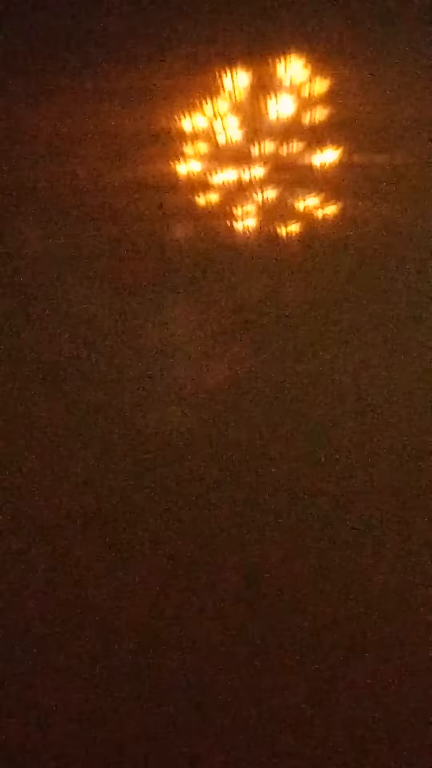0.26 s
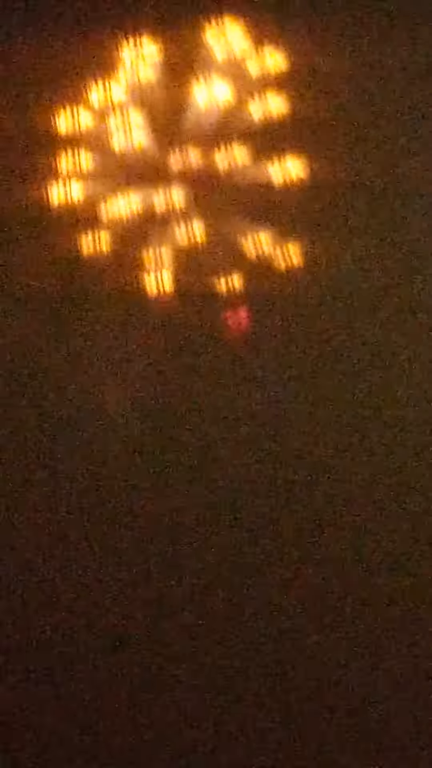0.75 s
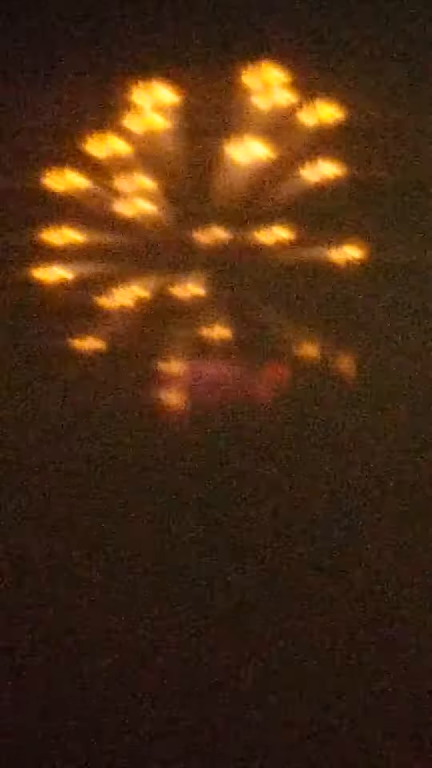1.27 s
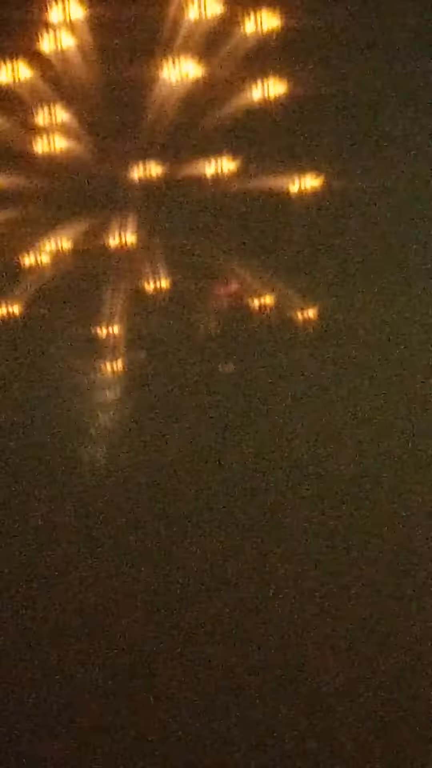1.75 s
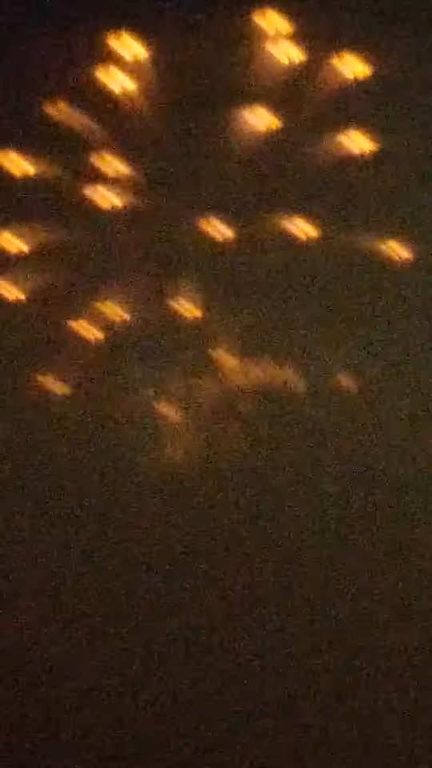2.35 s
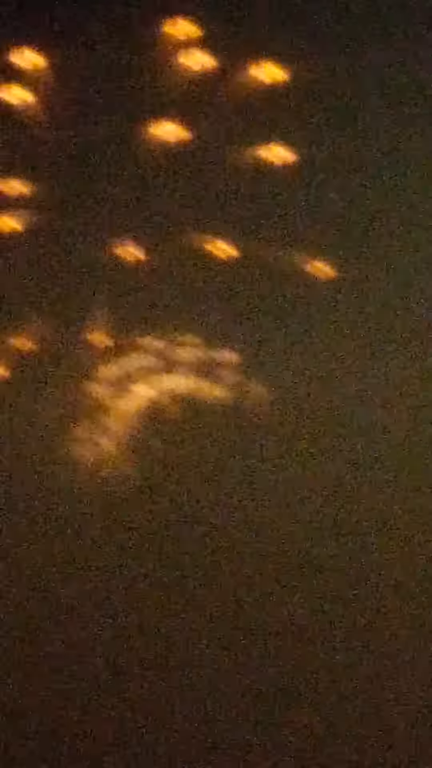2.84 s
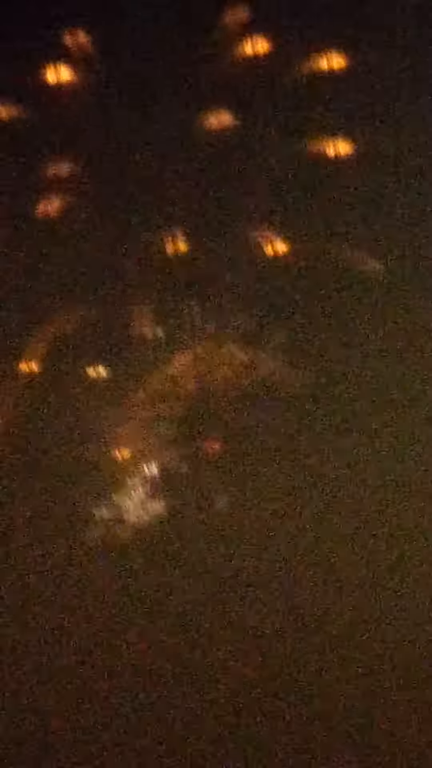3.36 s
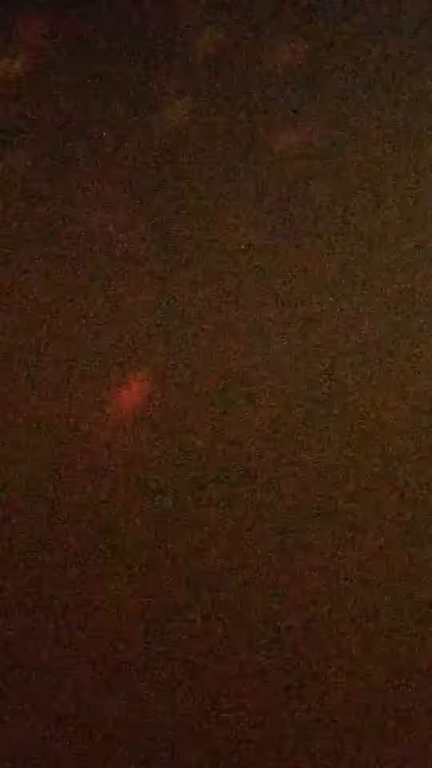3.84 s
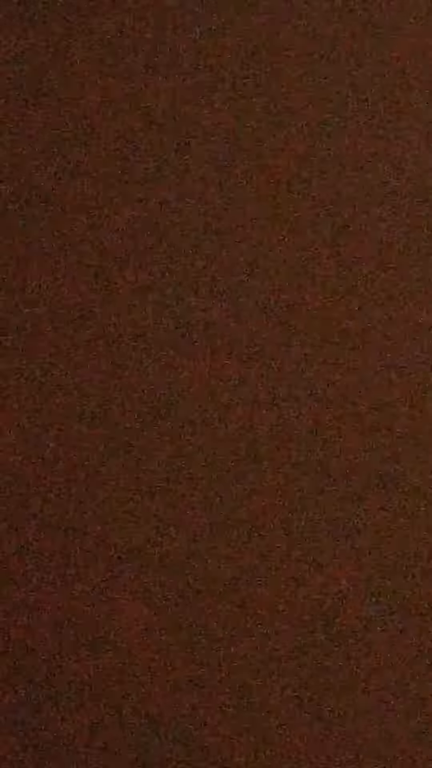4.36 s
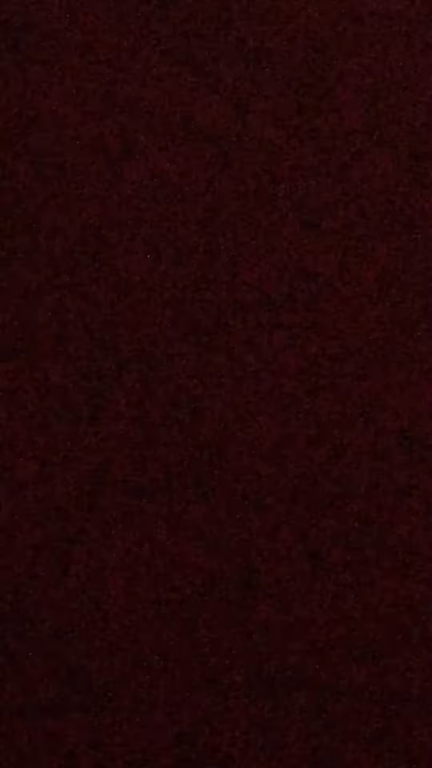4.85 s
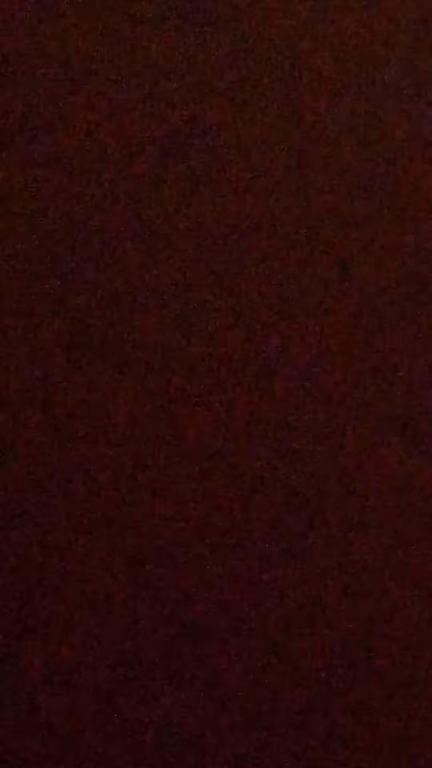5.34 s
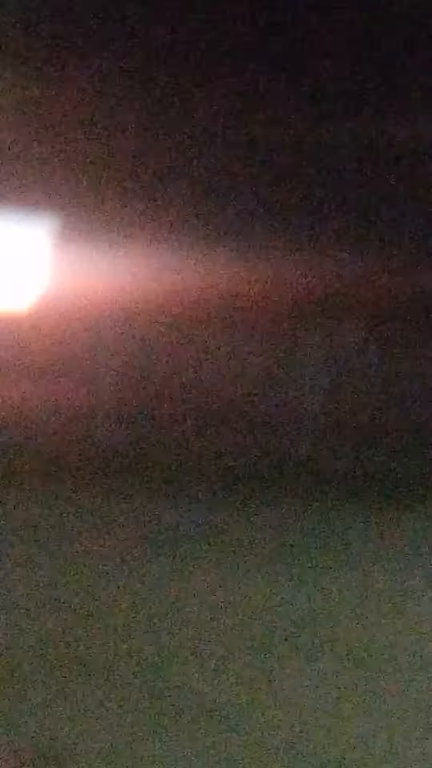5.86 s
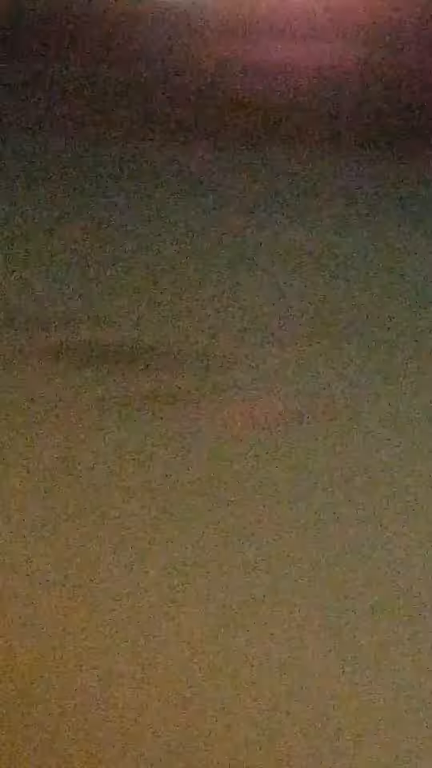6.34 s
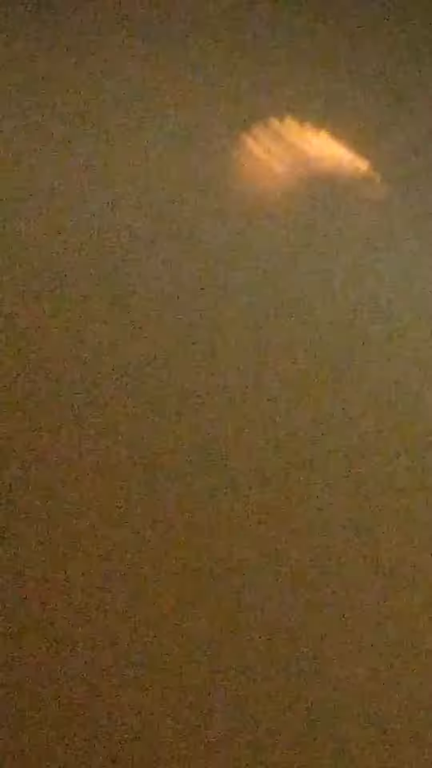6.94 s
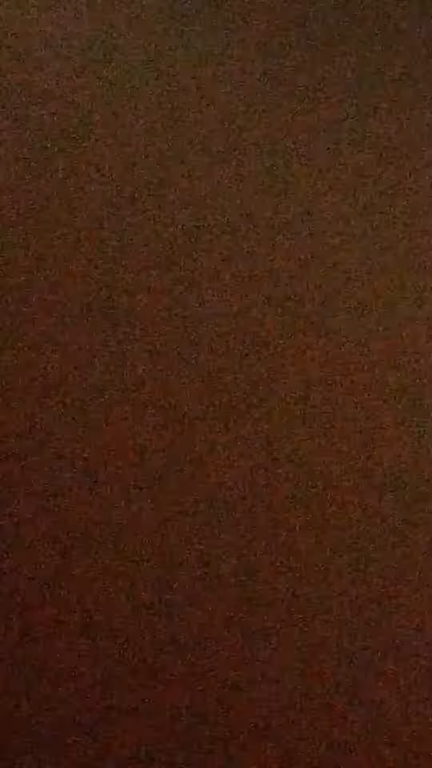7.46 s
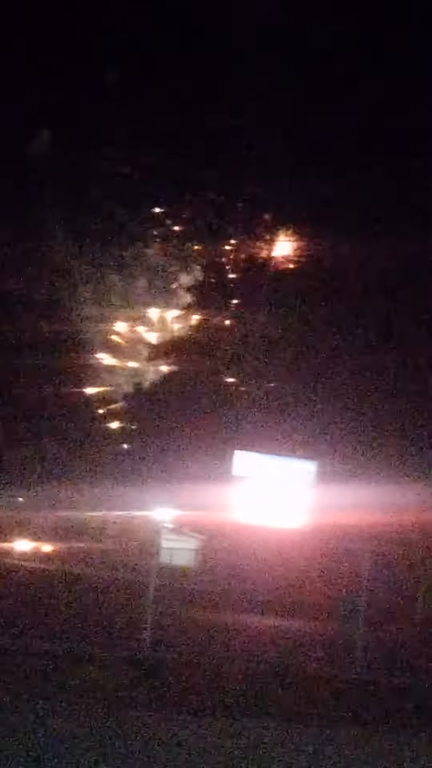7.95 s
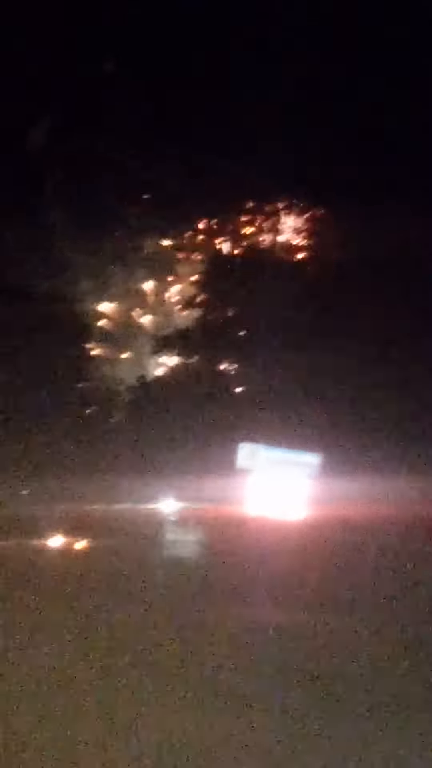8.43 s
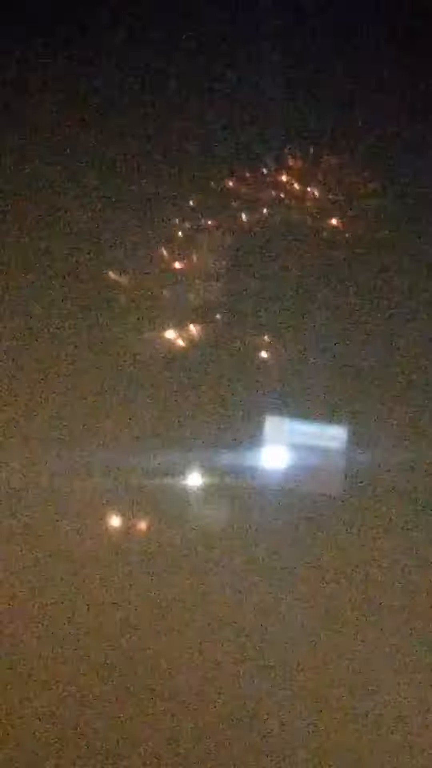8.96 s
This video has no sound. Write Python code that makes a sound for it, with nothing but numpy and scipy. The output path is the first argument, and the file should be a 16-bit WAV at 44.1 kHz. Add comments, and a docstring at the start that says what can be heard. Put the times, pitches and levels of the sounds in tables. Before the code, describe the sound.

Outdoors at night, a phone picks up fireworks bursting several times a second. Each is a dry crack with a low boom, quickly repeated by ground and walls, then a short rumble and faint wash from farther off. Sizes vary; the heaviest bangs come near eight seconds. Very faint crickets and a distant traffic hum lie beneath.

```python
"""Firework shells burst in quick succession over open ground at night, heard through a phone.
Each bang is a noise crack and a low pressure swing (boom), repeated by ground and walls; decaying noise
then rolls in from farther off. Rolls and one hollow slap without a sharp crack are noise near a pitch.
Two crickets trill in sagging tones over distant traffic, a filtered noise hum. Faint narrow hiss and
treble ticks are shaped noise."""
import sys
import numpy as np
from scipy import signal
from scipy.fft import rfft, irfft, next_fast_len
from scipy.io import wavfile
from scipy.ndimage import uniform_filter1d, map_coordinates

SR = 44100
rng = np.random.default_rng(int(sys.argv[2]) if len(sys.argv) > 2 else 0)


def persist_wave(psi):
    """Save psi, clipped to +-1, as 16-bit WAV."""
    counts = np.round(np.clip(psi, -1, 1) * 32767).astype(np.int16)
    wavfile.write(sys.argv[1], SR, np.atleast_2d(counts).T)


N = 405719  # scene length [samples]
SPAN = 32768  # length of one bang with its roll [samples]

# Shell bursts: (time [s], crack level [dB], boom re crack [dB], treble loss [dB/kHz], boom pitch [Hz],
# wall echo [dB], roll length [s])
SHELL_BURSTS = [(0.003, -24.5, 7.5, 4.5, 194, -12, 0.095), (0.226, -35, -16, 6, 200, -5, 0.086),
                (0.244, -19, 6, 4.5, 160, 3.5, 0.31), (0.428, -12.5, -1, 5.5, 166.3, -2, 0.18),
                (0.557, -17, 4.5, 5, 156, 4, 0.18), (0.683, -19.5, -19.5, 6.5, 150, 9.5, 0.14),
                (0.929, -19, -51, 9.5, 162, 8.5, 0.1), (1.309, -24.5, 11, 7, 87.6, 4.5, 0.19),
                (1.347, -23, -10, 6, 108, 14.5, 0.14), (1.386, -26.5, -1, 14.5, 108, -19, 0.13),
                (1.434, -10, -4.5, 4, 164, -2.5, 0.2), (1.557, -15, -3, 3.5, 197, 5, 0.21),
                (1.876, -14.5, -1, 4, 169, 7, 0.23), (2.24, -13.5, -6, 8, 160, -1.5, 0.27),
                (2.277, -13.5, 1, 6, 185.2, 0.5, 0.17), (2.436, -22.5, -23, 7.5, 99, 8.5, 0.13),
                (2.606, -18, 8, 5.5, 148.5, 0.5, 0.19), (2.632, -7.5, -13.5, 5.5, 182, 3.5, 0.25),
                (2.889, -11, -0.5, 5, 175, -5, 0.17), (3.082, -7, 5.5, 2, 108.7, -4.5, 0.33),
                (3.299, -23, 2, 10, 161, -9, 0.15), (3.319, -21.5, 2.5, 3.5, 230, 10.5, 0.17),
                (3.341, -7, -11, 6, 152.4, -12, 0.33), (3.503, -11.5, -6.5, 6.5, 141.5, 3, 0.22),
                (3.678, -12.5, -1, 4.5, 150, 6, 0.25), (4.07, -14, -7.5, 4.5, 168, -0.5, 0.2),
                (4.178, -13.5, -3.5, 4, 159.3, 7.5, 0.37), (4.21, -16.5, -9.5, 3.5, 197.5, 2.5, 0.22),
                (4.398, -11.5, -17, 7, 337, 0, 0.15), (4.586, -11, -6.5, 6, 163, 3, 0.21),
                (4.619, -19, 8, 3, 213, 3, 0.12), (4.733, -13.5, 0, 4.5, 174, -19, 0.21),
                (4.834, -20, -0.5, 5.5, 203, -6, 0.1), (4.871, -13, -4, 6, 337, 3.5, 0.14),
                (5.042, -13.5, -4, 5, 169, 4.5, 0.27), (5.097, -12, -3.5, 5.5, 167.4, 3, 0.31),
                (5.359, -9, 1, 3.5, 155.4, -4, 0.18), (5.58, -18.5, -1.5, 4, 181, 3.5, 0.26),
                (5.588, -11.5, -0.5, 3, 128.5, 4.5, 0.28), (6.124, -14, 1.5, 5, 137, 3.5, 0.28),
                (6.185, -17, -3, 5, 157, -9, 0.21), (6.225, -19, 3.5, 3.5, 246, -7, 0.1),
                (6.401, -8.5, -12.5, 6.5, 321, 4.5, 0.14), (6.495, -9.5, -3, 4, 214, -2.5, 0.19),
                (6.591, -16, -7, 4.5, 210, 5, 0.21), (6.629, -23, 2.5, 2, 237, -10, 0.06),
                (6.853, -8.5, -14.5, 3.5, 306, -1, 0.14), (7.206, -15.5, 4, 2.5, 127.4, 2, 0.27),
                (7.783, -8.5, -8, 4.5, 170, 1.5, 0.17), (7.8748, -1.5, 2, 1.5, 109, -2, 0.15),
                (7.945, -5, 5, 4, 90, -5, 0.34), (8.485, -13, -15.5, 5, 257, 6.5, 0.21),
                (8.629, -16, -2, 4.5, 334, -5, 0.14), (8.81, -7.5, 5.5, 3, 106.8, -5.5, 0.39),
                (8.977, -27, 5.5, 5, 140, 2, 0.38), (9.086, -20, 4, 6.5, 144, -12, 0.13)]
# Reflections from ground and walls: (delay [s], crack gain [dB], boom gain [dB], boom pitch [factor])
NEAR_ECHOES = [(.016, -4, -13, 1.1), (.0355, -11, -3, 1.35), (.052, -18, -10, 1.3)]
# Crack spectrum close by: (frequency [Hz], density [dB per Hz])
CRACK_SPECTRUM = [(300, -8), (560, 8), (850, 2.5), (1400, 1.5), (2200, -3), (3500, -4), (6000, -8),
                  (7200, -18), (10000, -29), (15000, -31.5)]
# Spectrum of the roll's bass: (frequency [multiple of boom pitch], density [dB per Hz])
RUMBLE_SPECTRUM = [(0.253, -51.5), (0.453, -5.5), (0.696, -0.5), (1.098, 4), (1.498, -1), (2.398, -9),
                   (4.501, -23)]
# Decay of the roll: (frequency [Hz], t60 [roll lengths])
ROLL_DECAY = [(70, 4.46), (150, 2.23), (400, 1.51), (1100, 2.14), (3000, 1.32), (8000, 0.45)]
# Decay of the far wash: (frequency [Hz], t60 [multiples of WASH_STRETCH_S])
WASH_DECAY = [(100, 12), (300, 0.33), (1100, 2.15), (3000, 1.95), (6000, 1.1), (9000, 0.84)]
# Distant traffic: (frequency [Hz], density [dB per Hz])
TRAFFIC_SPECTRUM = [(30, -26), (60, -13), (109, -2.5), (174, 0.5), (364, -14.5), (499, -13.5), (1250, -19),
                    (2500, -32.5), (5000, -43), (7000, -71.5)]
# Cricket trills, the first by the lower cricket: (centre of first chirp [s], end [s], chirp period [s],
# pitch [Hz], chirp length [s], pitch sag [share])
CRICKET_TRILLS = [(.017, 9.2, .07497, 6640, .028, .08), (.021, 1.4, .05627, 7500, .021, .03),
                  (1.973, 5.2, .05611, 7480, .021, .03), (5.49, 5.95, .055, 7350, .021, .05),
                  (5.972, 7.88, .0569, 7450, .021, .03)]
# Loudness of the two crickets: (time [s], lower cricket [dB], higher cricket [dB])
CRICKET_LEVELS = [(0, -69, -71), (1.3, -67, -77.5), (2.7, -84, -75.5), (3.6, -72, -66.5), (5, -93, -78),
                  (5.9, -81, -86.5), (6.6, -71.5, -71.5), (7.8, -78, -72), (9.2, -86, -96.5)]
# Faint narrow hiss: (start [s], end [s], level [dB])
HISS_STRETCHES = [(0.648, 0.986, -69), (1.927, 2.058, -75)]
# Colour of that hiss: (frequency [Hz], density [dB per Hz])
HISS_SPECTRUM = [(3400, -14), (4000, 1), (4600, -1), (5200, 1), (5700, -36)]
# Rolls and one hollow slap without a sharp crack: (time [s], level [dB], pitch [Hz], length [s])
CRACKLESS_ROLLS = [(2.432, -27.5, 103.5, 0.069), (3.394, -20, 148, 0.038), (4.285, -25, 94.4, 0.12),
                   (5.297, -22.5, 108, 0.038), (6.35, -29.5, 101, 0.14), (7.363, -39, 850, 0.065),
                   (8.202, -27.5, 113.5, 0.18), (8.412, -35, 98.4, 0.29), (9.142, -27, 118.5, 0.061)]
# Each is noise gathered near its pitch: (frequency [multiple of pitch], density [dB per Hz])
CRACKLESS_SPECTRUM = [(.35, -40), (.7, -9), (1, 0), (1.35, -6), (2, -11), (3, -26), (4.5, -60)]
# Ticks close to the microphone: (time [s], starting level [dB], t60 [s])
CLOSE_TICKS = [(4.1215, -60, .02), (5.4, -69, .2), (6.7158, -66, .006), (6.7361, -45, .006)]
# Microphone hiss: (frequency [Hz], density [dB per Hz])
SELF_NOISE_SPECTRUM = [(2000, -8), (6000, -1), (8000, -10), (13000, -14), (14600, -12), (15200, -7)]
# Response of the microphone held over the ground: (frequency [Hz], gain [dB])
PHONE_RESPONSE = [(25, -4), (45, -6.5), (70, -2.5), (200, 1.5), (330, 4.5), (420, 1), (540, -6.5),
                  (750, -1), (15000, 0.5)]

MIDDLING_DB, MIDDLING_HZ = -15, 160  # crack level and boom pitch of an ordinary shell
# Treble of the roll re a middling crack; share of a crack's strength that it follows
RATTLE_DB, RATTLE_FOLLOWS = -15.5, 0.2
# Bass of the roll re the boom; shares of boom and crack strength it follows; higher booms scatter more
RUMBLE_DB, RUMBLE_FOLLOWS, BIG_RUMBLE_SHARE, RUMBLE_DB_PER_OCTAVE = -4.5, 0.54, 0.82, 7
# Far wash re the crack; deep, big shells carry farther
WASH_DB, WASH_DB_PER_OCTAVE, WASH_STRETCH_S = -39.5, -10, 0.97
# Bright edge of the shock front: middling crack without treble loss [dB], dB gained per dB of crack,
# spread [s], dB lost per dB/kHz of treble loss
SNAP_DB, SNAP_GROWS, SNAP_S, SNAP_LOSS = -55.5, 2.1, 0.0018, 8
# Shells with little boom lose crack bass below this pitch: dB per octave for each dB of boom missing
THIN_HZ, THIN_SHARE = 755, 0.3
RISE_CYCLES = 2  # a crackless roll swells over about this many cycles of its pitch
TRAFFIC_DB, SELF_NOISE_DB = -55.5, -87
TOP_HZ = 15750  # band limit of the phone


def amp(db):
    """Level definition: 20 dB is a tenfold amplitude."""
    return 10 ** (np.asarray(db) / 20)


def unit(x):
    """Power normalisation: scale each row to an rms of 1."""
    return x / np.sqrt(np.mean(x ** 2, axis=-1, keepdims=True) + 1e-20)


def along(points, hz):
    """Linear interpolation of (frequency, value) points over log frequency."""
    f, v = np.transpose(points)
    return np.interp(np.log(hz + 1e-3), np.log(f), v)


def curves(rows):
    """Linear interpolation in time: one value per sample for each column after the time."""
    s, *cols = np.transpose(rows)
    return [np.interp(np.arange(N) / SR, s, c) for c in cols]


def smooth_twice(x):
    """Repeated moving average along the last axis."""
    return uniform_filter1d(uniform_filter1d(x, size=80), size=80)


def noise(shape, spectrum, scale=1, loss_db=0, ripple_db=0, thin_db=0):
    """Spectral shaping: white noise filtered to rms 1, each row with its own scale, loss and ripple."""
    hz = np.fft.rfftfreq(shape[-1], 1 / SR)
    relative = hz / scale
    inside = (relative > spectrum[0][0]) & (relative < spectrum[-1][0] * 2)
    ripple = unit(smooth_twice(rng.standard_normal(shape[:-1] + hz.shape)))
    level_db = along(spectrum, relative) - loss_db * hz / 1000 + ripple_db * ripple
    level_db = level_db + thin_db * np.log2(np.clip(THIN_HZ / (hz + 1), 1, None))
    return unit(irfft(rfft(rng.standard_normal(shape)) * amp(level_db) * inside, shape[-1]))


def steady(x):
    """Envelope compression: evens out the swells of low noise."""
    return unit(x / (np.abs(signal.hilbert(x)) + .3) ** .6)


def fading(x, decay, stretch, patchy_db):
    """Frequency-dependent reverberation: each band decays at its own speed, in uneven patches."""
    hz, t, z = signal.stft(x, SR, nperseg=512)
    field = uniform_filter1d(rng.standard_normal(z.shape), 5, axis=1)
    field = uniform_filter1d(field, 3, axis=2)
    fall_db = 60 * t / (along(decay, hz)[:, None] * stretch)
    gain = amp(patchy_db * field / field.std() - fall_db)
    return signal.istft(z * gain, SR, nperseg=512)[1][:, :x.shape[1]]


def traffic():
    """Random amplitude modulation: a low far hum that swells a little."""
    swell = map_coordinates(rng.standard_normal(80), [np.arange(N) * 7 / SR])  # 7 knots per second
    return amp(TRAFFIC_DB + 0.71 * swell) * noise((next_fast_len(N),), TRAFFIC_SPECTRUM)[:N]


def shock_fronts(columns, crack, dull):
    """Shock propagation and reflection: crack and boom arrive directly, then as smeared near echoes."""
    _, crack_db, boom_db, loss_db, boom_hz, wall_db, _ = columns
    t = np.arange(SR // 8) / SR
    sound = np.zeros((len(SHELL_BURSTS), len(t)))
    luck = rng.standard_normal((len(SHELL_BURSTS), len(NEAR_ECHOES) + 1, 2))
    direct = (0.0022, 0.027, 0.019, 0.91)  # same columns as the echoes
    for k, (delay, echo_crack_db, echo_boom_db, factor) in enumerate([direct] + list(NEAR_ECHOES)):
        delay = delay * (1 + 0.038 * luck[:, k, :1])  # each shell bursts at its own spot
        u = np.clip(t - delay, 0, None) / (.0042 + .0005 * k)  # rough surfaces smear each echo more
        wall = wall_db * (k > 1)  # the later echoes depend on where the shell stands to the walls
        burst = (u * np.exp(1 - u)) ** 3.56  # each crack swells and fades within a few ms
        level_db = crack_db - 7.5 + echo_crack_db + 1.05 * wall + 0.76 * luck[:, k, 1:] * (k > 0)
        sound += amp(level_db) * burst * (dull if k else crack)[:, :len(t)]
        cycles = factor * boom_hz * (t - delay - .003 - .75 / boom_hz)
        # One push between two dips
        swing = np.cos(2 * np.pi * cycles) * np.exp(-(cycles / 0.49) ** 2) * np.clip(u, 0, 1)
        sound += amp(crack_db + boom_db - 0.5 + echo_boom_db + wall) * swing
    edge = np.diff(rng.standard_normal((len(SHELL_BURSTS), len(t) + 1)))
    edge = edge * np.exp(-np.abs(t - .004) / SNAP_S)
    return sound + amp(SNAP_DB + SNAP_GROWS * (crack_db - MIDDLING_DB) - SNAP_LOSS * loss_db) * edge


def reverberation(columns, dull):
    """Diffuse scattering: far surfaces return a treble rattle, a bass rumble and a long faint wash."""
    _, crack_db, boom_db, _, boom_hz, _, length = columns
    length = np.clip(length, .03, 1)
    octaves = np.log2(boom_hz / MIDDLING_HZ)
    rattle_db = RATTLE_DB + (RATTLE_FOLLOWS - 1) * (np.maximum(crack_db, -25) - MIDDLING_DB)
    rumble_db = RUMBLE_DB + (RUMBLE_FOLLOWS - 1) * np.clip(boom_db, -12, 12)
    rumble_db += RUMBLE_DB_PER_OCTAVE * octaves + (BIG_RUMBLE_SHARE - 1) * (crack_db - MIDDLING_DB)
    wash_db = WASH_DB + WASH_DB_PER_OCTAVE * octaves
    t = np.arange(SPAN) / SR
    knots = rng.standard_normal((len(SHELL_BURSTS), SPAN // 128))
    # Far surfaces answer one by one, some ms apart
    clumps = unit(amp(1.6 * signal.resample(knots, SPAN, axis=1)))
    rattle = amp(rattle_db) * clumps * np.roll(dull, SPAN // 2, axis=1)
    rumble = steady(noise(dull.shape, RUMBLE_SPECTRUM, boom_hz))  # low echoes follow at like size
    rumble = amp(boom_db) * (1 - np.exp(-(t / 0.042) ** 2)) * rumble
    hold = 1 / (1 + (t / length) ** 6)  # the roll holds, then drops away steeply near its roll length
    roll = rattle + amp(rumble_db) * rumble
    roll = hold * fading(roll, ROLL_DECAY, length[:, :, None], patchy_db=2.5)
    wash = dull[:, ::-1] + amp(-9.0) * rumble  # hills and trees
    wash = fading(wash, WASH_DECAY, WASH_STRETCH_S, patchy_db=5.5)
    wash = amp(wash_db) * np.cos(np.pi / 2 * t / t[-1]) * wash
    rise = 1 - np.exp(-t / 0.0065)
    return amp(crack_db) * rise * (roll + wash)


def bangs():
    """Superposition: every shell adds its shock front, near echoes and far reverberation."""
    columns = np.transpose(SHELL_BURSTS)[:, :, None]
    s, _, boom_db, loss_db, *_ = columns
    thin_db = THIN_SHARE * np.clip(boom_db, -30, 0)
    shape = (len(SHELL_BURSTS), SPAN)
    # Scattered paths colour every bang differently; echoes lose more treble
    crack = noise(shape, CRACK_SPECTRUM, loss_db=loss_db, ripple_db=3.0, thin_db=thin_db)
    dull = noise(shape, CRACK_SPECTRUM, loss_db=loss_db + .7, ripple_db=2.5, thin_db=thin_db)
    spikes = signal.resample(rng.standard_normal((len(SHELL_BURSTS), SPAN // 32)), SPAN, axis=1)
    crack = unit(amp(4.5 * spikes) * crack)  # the front breaks into a few sharp spikes
    sound = reverberation(columns, dull)
    front = shock_fronts(columns, crack, dull)
    sound[:, :front.shape[1]] += front
    sky = np.zeros(N + SPAN)
    for start, row in zip(s[:, 0], sound):
        sky[max(round((start - .0025) * SR), 0):][:SPAN] += row
    return sky[:N]


def crickets():
    """Stridulation: each wing stroke is a short tone whose pitch sags at the end."""
    t = np.arange(N) / SR
    low_db, high_db = curves(CRICKET_LEVELS)
    song = np.zeros(N)
    for k, (first, end, period, hz, stroke, sag) in enumerate(CRICKET_TRILLS):
        count, u = np.divmod(t - first + stroke / 2, period)
        u = np.clip(u / stroke, 0, 1)  # progress through the stroke
        index = (count - count.min()).astype(int)
        size_db = rng.normal(0, 0.87, index.max() + 1)[index]
        pitch = hz * (1 - sag * np.clip(u - .6, 0, 1) / .4)
        on = (count >= 0) & (t < end)
        level = amp((high_db if k else low_db) + size_db) * np.sin(np.pi * u) ** 1.2
        song += on * level * np.sin(2 * np.pi * np.cumsum(pitch) / SR)
    return song


def hiss():
    """Band-limited noise: short stretches of narrow hiss with soft edges."""
    t = np.arange(N) / SR
    level = np.zeros(N)
    for start, end, db in HISS_STRETCHES:
        level += amp(db) * np.clip(np.minimum(t - start, end - t) / 0.027, 0, 1)
    return level * noise((next_fast_len(N),), HISS_SPECTRUM)[:N]


def crackless_rolls():
    """Band-limited noise gathered near a pitch: rolls and one hollow slap swell, then drop away."""
    s, db, hz, length = np.transpose(CRACKLESS_ROLLS)[:, :, None]
    t = np.arange(SPAN // 2) / SR
    rumble = steady(noise((len(CRACKLESS_ROLLS), SPAN // 2), CRACKLESS_SPECTRUM, hz))
    swell = 1 - np.exp(-(t * hz / RISE_CYCLES) ** 2)
    drop = 1 / (1 + (t / length) ** 8)
    out = np.zeros(N + SPAN)
    for start, row in zip(s[:, 0], amp(db) * swell * drop * rumble):
        out[round(start * SR):][:len(row)] += row
    return out[:N]


def ticks():
    """Exponential decay of differenced noise: tiny dry clicks and rustles, mostly treble."""
    out, t = np.zeros(N), np.arange(SR // 8) / SR
    for s, db, t60 in CLOSE_TICKS:
        treble = unit(np.diff(rng.standard_normal(len(t) + 1)))
        out[round(s * SR):][:len(t)] += amp(db - 60 * t / t60) * treble
    return out


def scene():
    """Superposition: all sources add at the microphone."""
    return (traffic() + bangs() + crickets() + hiss() + crackless_rolls() + ticks())[None]


def record(dry):
    """Transducer limits: the phone adds hiss, cuts deep bass, rounds high peaks and limits the band."""
    x = dry + amp(SELF_NOISE_DB) * noise((next_fast_len(N),), SELF_NOISE_SPECTRUM)[:N]
    x = signal.sosfilt(signal.butter(2, 55.5, "high", fs=SR, output="sos"), x)
    x = x / (1 + np.abs(x / .75) ** 4) ** (1 / 4)  # soft saturation towards 0.75
    m = next_fast_len(N + SR // 4)
    hz = np.fft.rfftfreq(m, 1 / SR)
    return irfft(rfft(x, m) * amp(along(PHONE_RESPONSE, hz)) * (hz < TOP_HZ), m)[..., :N]


dry = scene()
out = record(dry)
persist_wave(out)
```